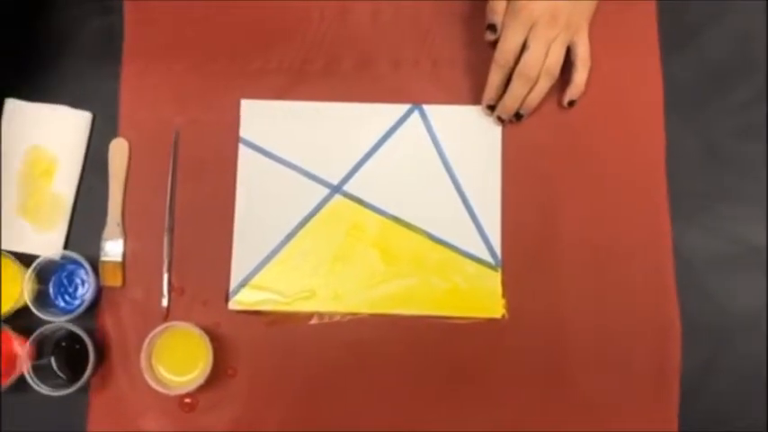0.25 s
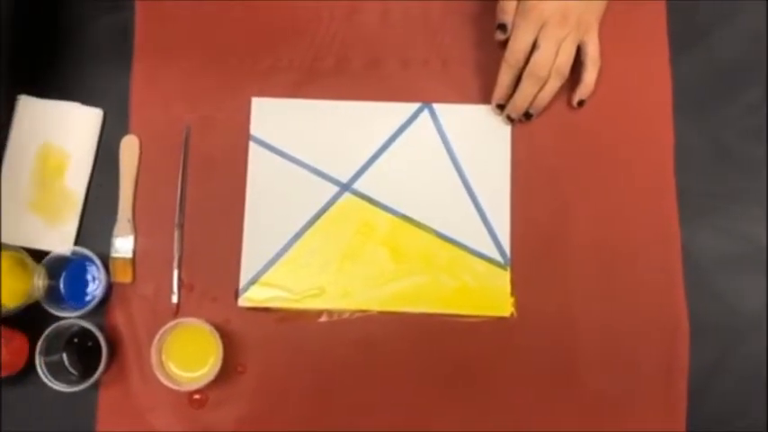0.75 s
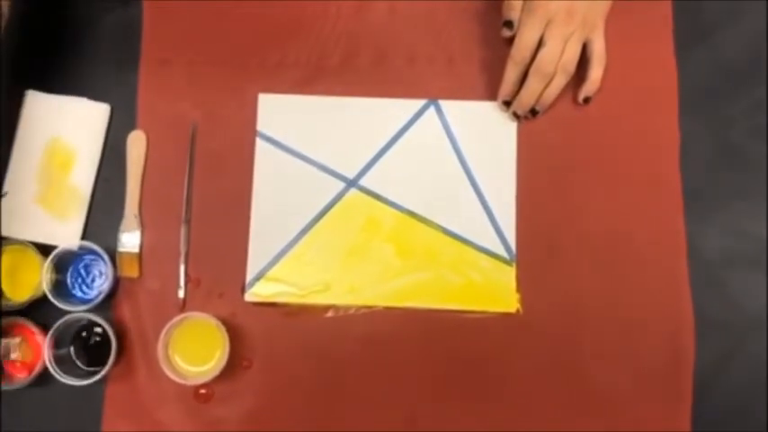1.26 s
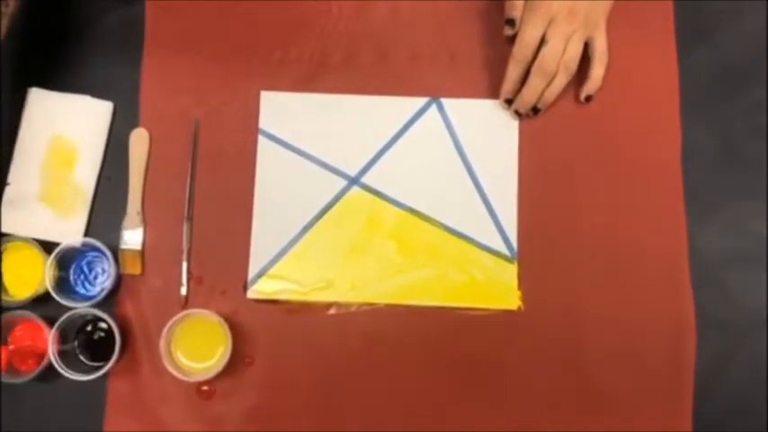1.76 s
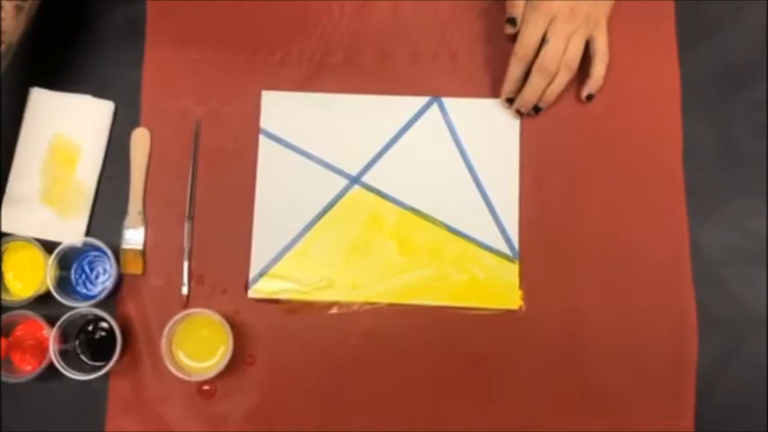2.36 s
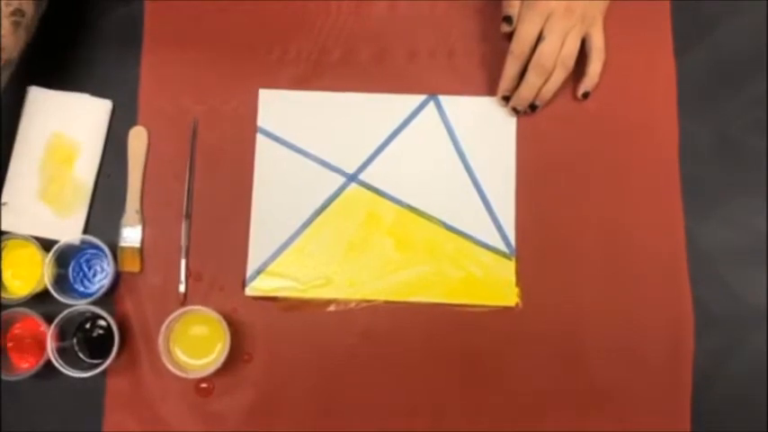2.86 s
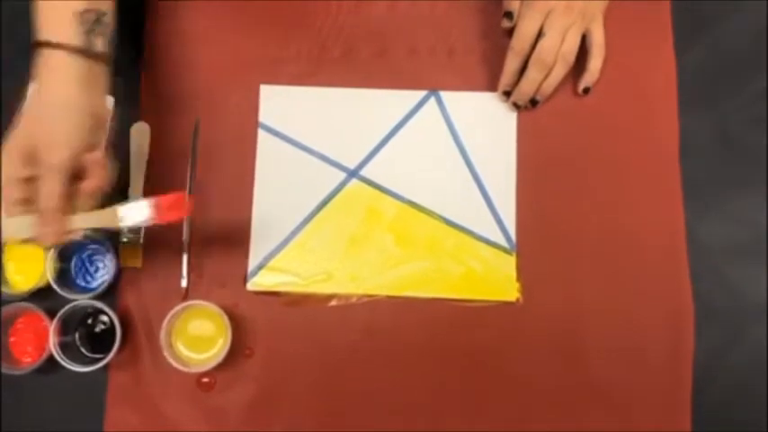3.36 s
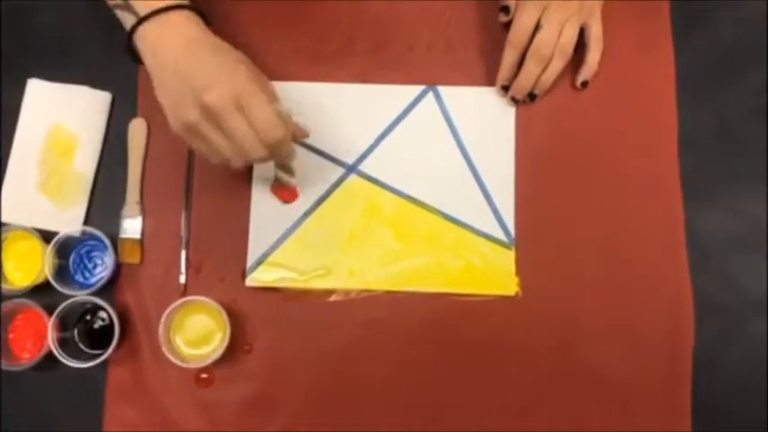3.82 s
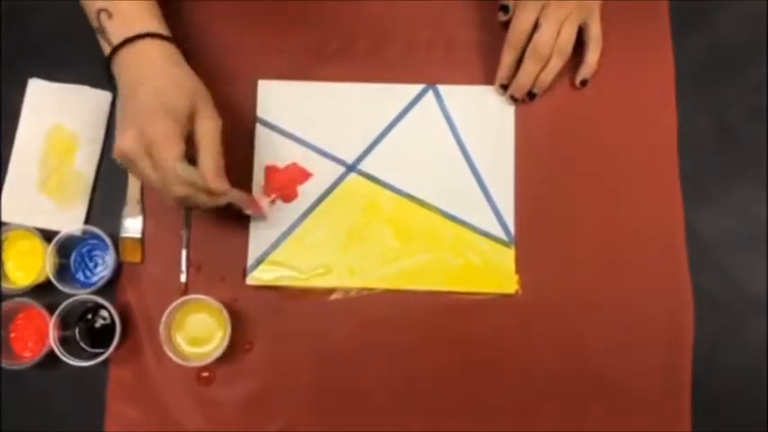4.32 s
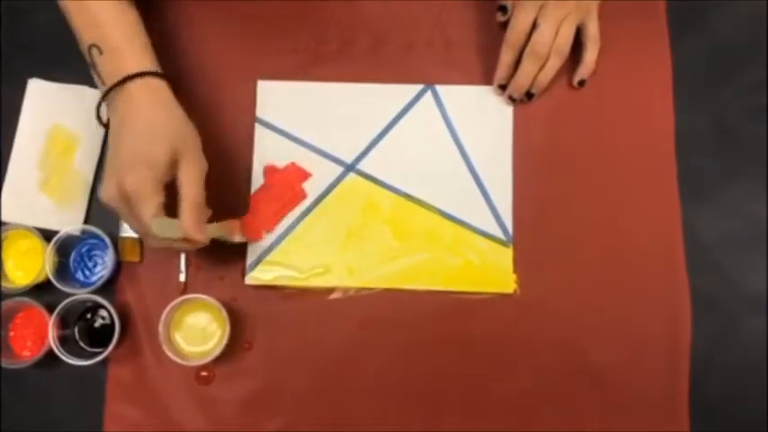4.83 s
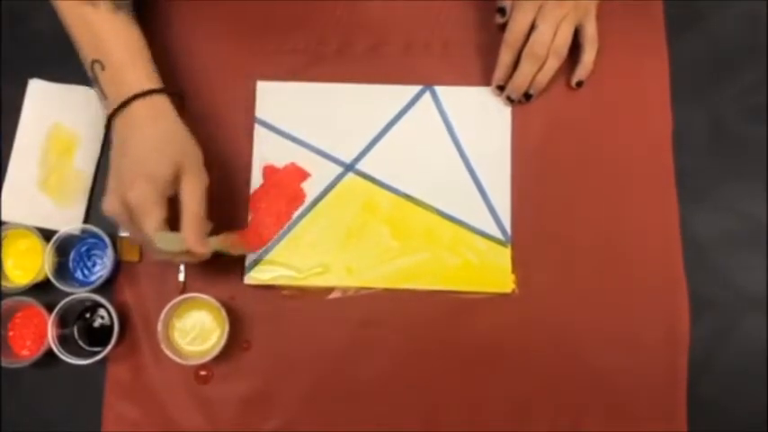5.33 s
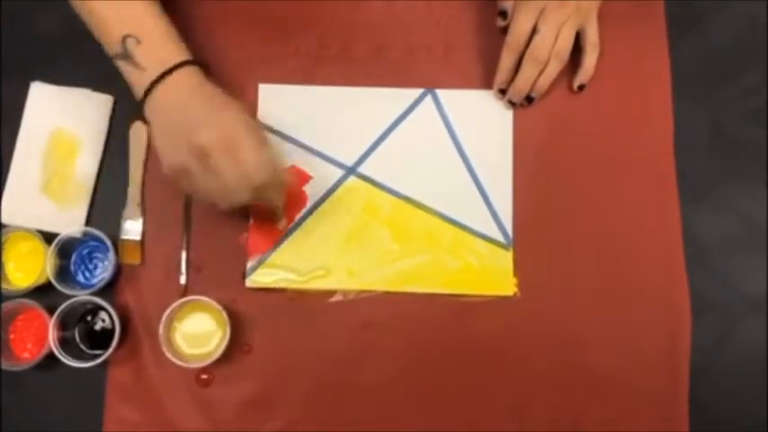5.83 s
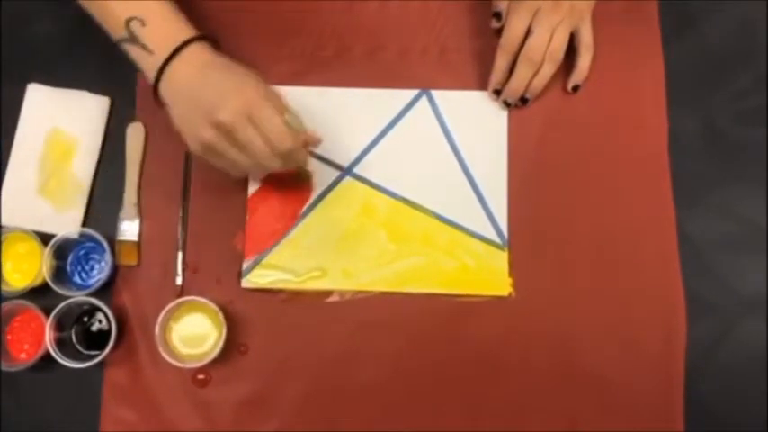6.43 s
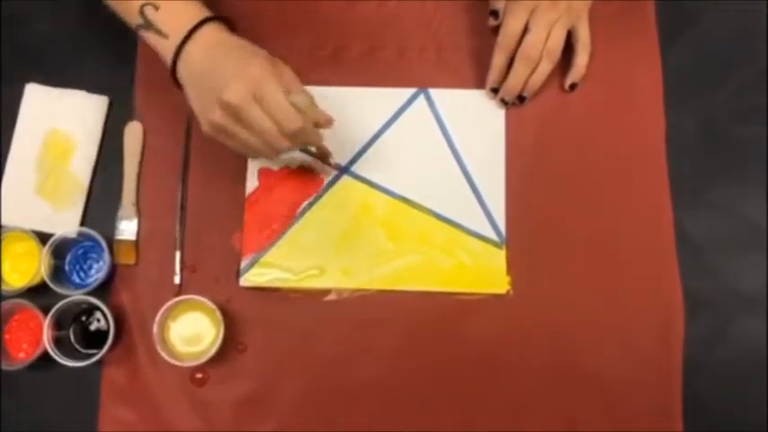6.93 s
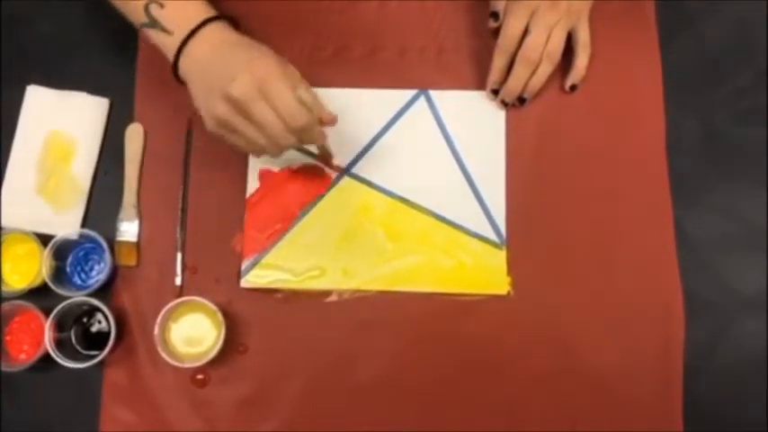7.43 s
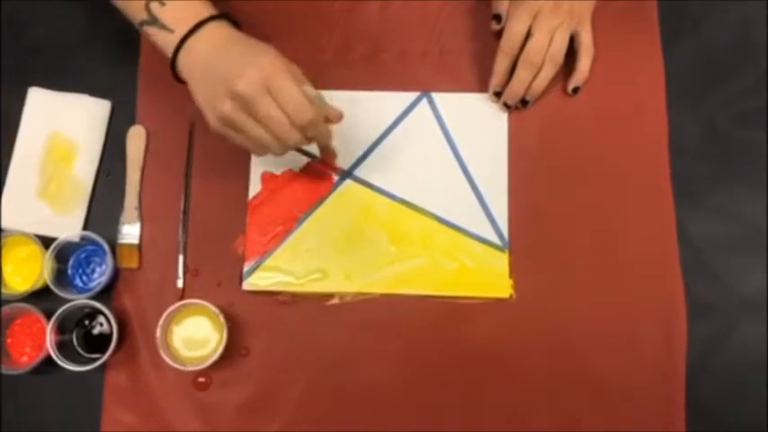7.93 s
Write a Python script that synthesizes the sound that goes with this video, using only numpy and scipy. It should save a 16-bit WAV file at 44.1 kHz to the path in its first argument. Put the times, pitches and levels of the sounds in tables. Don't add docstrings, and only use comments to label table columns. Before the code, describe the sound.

First comes the clutter of cups: a knock, a scrape, one loud double landing with tiny bounces, then scattered rattles and a squealing drag. After a near-quiet pause over hum and soft hiss, a sleeve rustles and bristles start dabbing and brushing a canvas, very softly and irregularly. Close microphone above the table, short dull room echo.

```python
import sys
import numpy as np
from scipy import signal
from scipy.fft import rfft, irfft
from scipy.io import wavfile
from scipy.ndimage import uniform_filter1d

SR = 44100
rng = np.random.default_rng(int(sys.argv[2]) if len(sys.argv) > 2 else 0)


def voltage_ratio(decibels):
    exponent = np.asarray(decibels, float) / 20
    return 10 ** exponent


def wav_out(sig):
    wavfile.write(sys.argv[1], SR, np.round(np.clip(np.atleast_2d(sig).T, -1, 1) * 32767).astype(np.int16))


N = 360738


def evened(x):
    return x / np.sqrt(np.mean(x ** 2) + 1e-20)


def read(points, hz):
    f, value = np.transpose(points)
    return np.interp(np.log(hz + 1), np.log(f + 1), value)


def curve(points):
    return np.interp(np.arange(N) / SR, *np.transpose(points))


def add(mix, s, sound):
    part = mix[round(s * SR):][:len(sound)]
    part += sound[:len(part)]


def resonate(x, hz, width):
    turn = np.exp(2j * np.pi * hz * np.arange(len(x)) / SR)
    r = np.exp(-np.pi * width / SR)
    return 2 * (turn * signal.lfilter([1 - r], [1, -r], x / turn)).real


def steep(x, hz, width):
    return evened(resonate(resonate(x, hz, width), hz, width))


def swells(s, db, swell_s, fade_s, bend=1):
    t = np.arange(0, N / SR + 0.002, 0.001)
    out = 0
    for at, top_db, up, down in np.broadcast(s, db, swell_s, fade_s):
        rise_db = 20 * np.maximum((at - t) / up, 0)
        fall_db = 20 * np.maximum((t - at) / down, 0) ** bend
        out = out + voltage_ratio(top_db - rise_db - fall_db)
    return np.interp(np.arange(N) / SR, t, out)


def scratch(per_s, spread_db, smooth):
    sizes = voltage_ratio(spread_db * np.minimum(rng.exponential(1, N), 5))
    slips = sizes * (rng.random(N) < per_s / SR)
    return evened(evened(slips * rng.standard_normal(N)) + smooth * rng.standard_normal(N))


def contact(t, t60):
    u = 9.3 * t / max(t60, 0.003)
    return u * np.exp(1 - u)


# frequency in Hz, density in dB per Hz.
AIR_SPECTRUM = [(20, -51), (42, -19), (58, -4.5), (80, 0.5), (150, -5), (200, -8), (340, -13.5),
                (480, -22.5), (850, -28.5), (1600, -40.5), (3200, -42), (7000, -45.5), (13700, -51),
                (14800, -54)]
# centre in Hz, width in Hz, level in dB.
AIR_BANDS = [(114, 9.2, -7), (2480, 770, 8.5), (3870, 160, 5.5), (8700, 170, 1.5), (9500, 170, 3.5),
             (15000, 690, 17)]


def air():
    level_db, patchy_db = -52, 0.6
    frames, hz = N // 512 + 6, np.fft.rfftfreq(2048, 1 / SR)
    a, b, patches = rng.standard_normal((frames, 1025, 3)).T
    patches = uniform_filter1d(patches, size=20, axis=0)
    patches = evened(uniform_filter1d(patches, size=8, axis=1))
    bands_db = sum(db / (1 + (2 * (hz - f) / w) ** 2) for f, w, db in AIR_BANDS)
    colour_db = read(AIR_SPECTRUM, hz) + bands_db
    z = (a + 1j * b) * voltage_ratio(colour_db[:, None] + patchy_db * patches)
    return voltage_ratio(level_db) * evened(signal.istft(z, nperseg=2048, noverlap=1536)[1][:N])


# frequency in Hz, width in Hz, level in dB.
FAN_TONES = [(270.9, 9.8, -65), (318.6, 4.6, -68), (349.4, 14, -66)]


def hum():
    hum_db, hum_hz = -46.5, 120.4
    flutter = steep(rng.standard_normal(N), hum_hz, 16)
    fan = sum(voltage_ratio(db) * steep(rng.standard_normal(N), hz, w) for hz, w, db in FAN_TONES)
    tone = np.sqrt(2) * np.sin(2 * np.pi * hum_hz * np.arange(N) / SR)
    return voltage_ratio(hum_db) * (tone + 0.12 * flutter) + fan


# time
# in seconds, level in dB.
WHIRR_LEVEL = [(0.0, -47), (0.2, -72), (0.8, -64), (1.41, -65), (1.62, -82), (3.16, -80), (3.62, -74),
               (4.03, -76), (4.65, -70), (5.88, -90), (6.79, -71.5), (7.4, -86), (7.81, -72.5), (8.18, -82)]
# time in seconds, change of the rumble in dB.
GUSTS = [(0.0, 13), (.7, -14), (1.16, 2), (1.6, -13), (2.78, 12.5), (3.16, -9), (3.62, 10), (4.3, 0),
         (5.88, 7), (6.79, -10), (8.18, -6)]


def ventilation():
    rumble_db, fizz_db, fizz_share = -63, -83, 0.18
    noise = rng.standard_normal((4, N))
    flicker = voltage_ratio(6.9 * evened(resonate(noise[0], 30.6, 30)))
    fizz = evened(flicker * steep(noise[1], 15100, 900))
    whirr = steep(noise[2], 1303, 170)
    rumble = steep(noise[3], 59.6, 11)
    gust_db = curve(GUSTS)
    moving_air = voltage_ratio(fizz_db + fizz_share * gust_db) * fizz + voltage_ratio(rumble_db + gust_db) * rumble
    return voltage_ratio(curve(WHIRR_LEVEL) - 3) * whirr + moving_air


# peak in seconds, level in dB, swell in seconds, fade in seconds.
RUSTLES = [
    (2.422, -67, 0.06, 0.11),
    (2.69, -66, 0.18, 0.11),
    (2.926, -69.5, 0.16, 0.12),
    (3.38, -70, .05, 0.054),
    (3.55, -64, 0.078, 0.21),
    (3.74, -74.5, .15, .06),
    (4.392, -65.5, 0.02, 0.027),
    (4.712, -71, 0.1, 0.036),
    (5.46, -70.5, .16, 0.08),
]
# frequency in Hz, level in dB.
RUSTLE_TONE = [(1500, -3.5), (3000, 2.5), (4000, -1), (5200, -6), (6200, 0.5), (7500, -8), (10000, -11),
               (14000, -30)]
# start in seconds, length in seconds, frequency in Hz, level in dB.
SQUEAKS = [
    (1.652, .05, 9500, -78),
    (7.59, 0.028, 9550, -79),
    (7.966, 0.038, 9800, -100.5),
    (8.07, 0.019, 9500, -82),
]


def rustle():
    crackle = scratch(2100, 2.6, 0.84)
    colour = voltage_ratio(read(RUSTLE_TONE, np.fft.rfftfreq(N, 1 / SR)))
    out = swells(*np.transpose(RUSTLES)) * evened(irfft(rfft(crackle) * colour, N))
    for s, length_s, hz, db in SQUEAKS:
        n = round(length_s * SR)
        squeak = steep(rng.standard_normal(4000), hz, 350)[:n]
        add(out, s, voltage_ratio(db) * squeak * np.hanning(n))
    return out


# peak in seconds, level in dB, swell in seconds,
# fade in seconds, low part in dB against it.
SLIDES = [
    (0.0, -46, 0.011, 0.11, 0.5),
    (.168, -52.5, 0.15, 0.061, 3),
    (.434, -46, 0.088, 0.17, 8),
    (.598, -56, .15, .1, -11),
    (.69, -55, 0.014, 0.12, -13),
    (.79, -60.5, 0.036, .2, 9),
    (.96, -67.5, 0.088, 0.49, 15),
    (1.17, -55.5, 0.25, 0.027, 2),
    (1.43, -56, .02, 0.13, -16),
    (1.53, -63, .15, 0.16, 9),
]
LONG_DRAG = [
    (1.275, -45.5, .1, 0.096, 0),
    (1.4, -53.5, 0.11, 0.016, 0),
]
# peak in seconds, level in dB, swell in seconds, fade in seconds.
RIM_SQUEALS = [
    (.04, -63, 0.089, 0.39),
    (.69, -64, .012, .1),
    (1.001, -70, .3, .35),
    (1.25, -54.5, 0.05, .25),
    (1.37, -67, .12, 0.062),
]


def slide():
    rub = scratch(1500, 2.5, 1.2)
    body = evened(steep(rub, 2146, 570) + 1.1 * steep(rub, 1900, 360))
    middle = steep(rub, 1160, 840)
    deep = evened(middle + 2.05 * steep(rub, 560, 800))
    out = swells(*np.transpose(RIM_SQUEALS)) * steep(rub, 4000, 560)
    for rows, low in (SLIDES, deep), (LONG_DRAG, middle):
        s, db, up, down, low_db = np.transpose(rows)
        out = out + swells(s, db, up, down) * body + swells(s, db + low_db, up, down) * low
    return out


# start in seconds, peak in dB, ring in Hz,
# thump in dB, tick in dB.
SET_DOWN = [
    (.3512, -46, 2000, -6, -3),
    (.357, -46, 2100, -14, -8),
    (.3653, -32, 3800, -25, -3),
    (.3683, -11, 1800, -20, -28),
    (.3702, -21, 1900, -17, -28),
    (.3753, -11.5, 1700, -2.5, -11),
    (.4152, -33, 2200, -18, -6),
    (.422, -30, 1350, -12, -12),
]
KNOCKS = [
    (0.027, -29.5, 1430, -2, -8.5),
    (0.097, -38, 2500, -26, -2),
    (0.769, -26.5, 1900, 4.5, -10),
    (0.948, -36.5, 2050, -18, -13),
    (0.986, -33, 2480, -6, -14),
    (1.411, -39, 2060, -24, -3),
    (4.827, -36, 2570, -10, -20),
]
# start in seconds, peak in dB, ring in Hz, thump in dB.
RATTLES = [(0.171, -45, 1400, -1), (0.22, -54.5, 2440, -3), (0.304, -55, 1290, -8), (0.562, -46, 2060, -1),
           (0.578, -39, 2230, -15), (0.604, -47, 2070, -8), (0.617, -44, 2480, -20),
           (0.681, -33, 2460, -28), (0.735, -38, 1860, 0), (0.746, -41, 2460, -4), (0.919, -54, 1990, -6),
           (1.038, -39, 2470, -16), (1.074, -41, 1840, -3), (1.104, -39.5, 2260, 1),
           (1.123, -37, 1340, -20), (1.137, -30.5, 1400, -3.5), (1.333, -38, 1920, -2),
           (1.444, -34, 2300, -23), (1.488, -39, 2480, 5), (1.543, -43, 1220, -26),
           (1.553, -48, 1300, -6.5), (5.128, -51.5, 2500, 3.5)]
# frequency in Hz, width in Hz, level in dB.
TABLE_SHIVER = [(199.6, 99.3, -11), (488, 200, 8), (900, 1400, 23), (1335, 630, -3), (1900, 514, -2.5),
                (2500, 440, -49), (4000, 800, -52.5)]
# frequency in Hz, level in dB, t60 in seconds.
TABLE_MODES = [(150, -17, .05), (186, -14, .06), (312, -16, .05), (449, -11, .06), (560, -22, .04)]


def knocks():
    soft_t60, hard_t60 = 0.014, 0.0048
    hard_db, hard_span_db = -26, 3
    rattle_tick_db = -24
    out, t = np.zeros(N), np.arange(5000) / SR
    fall_hz = 450 + 900 * np.exp(-t / 0.0033)
    thump = np.sin(2 * np.pi * np.cumsum(fall_hz) / SR) * voltage_ratio(-60 * t / 0.022)
    modes = sum(voltage_ratio(d - 60 * t / ring_s) * np.sin(2 * np.pi * f * t) for f, d, ring_s in TABLE_MODES)
    thump = thump + (1 - np.exp(-(t / 0.0013) ** 2)) * modes
    for s, db, hz, thump_db, tick_db in SET_DOWN + KNOCKS + [(*row, rattle_tick_db) for row in RATTLES]:
        t60 = hard_t60 + (soft_t60 - hard_t60) / (1 + np.exp((db - hard_db) / hard_span_db))
        grit = rng.standard_normal((3, len(t)))
        crack = 0.9 * t60 / soft_t60 * steep(grit[0], (hz + 1800) / 2, 1500)
        ring = (np.sin(2 * np.pi * hz * t) + crack) * contact(t, t60)
        tick = voltage_ratio(tick_db) * resonate(grit[1], 5800, 4500) * contact(t, 0.5 * t60)
        shiver = evened(sum(voltage_ratio(d) * steep(grit[2], f, w) for f, w, d in TABLE_SHIVER))
        shiver = shiver * voltage_ratio(-60 * t / 0.15) * (1 - np.exp(-t / 0.00057))
        heavy = voltage_ratio(thump_db) * (thump + voltage_ratio(-13.5) * shiver)
        add(out, s, voltage_ratio(db) * (ring + tick + heavy))
    return out


# start in seconds, peak in dB, centre in Hz, t60 in seconds.
DABS = [
    (3.9288, -57, 2580, 0.025),
    (4.2632, -44.5, 2240, 0.032),
    (4.5452, -48, 2500, 0.015),
    (4.799, -48, 2500, 0.044),
    (5.0836, -39.5, 2000, 0.043),
    (5.35, -43, 2310, 0.039),
    (5.6302, -52.5, 2300, 0.039),
    (7.112, -42, 2380, 0.065),
    (7.593, -51, 2560, 0.035),
    (8.1248, -46, 2350, 0.056),
]


def dabs():
    out, t = np.zeros(N), np.arange(3000) / SR
    for s, db, hz, t60 in DABS:
        puff = steep(rng.standard_normal(len(t)), hz, 950) * contact(t, t60)
        add(out, s - 0.002, voltage_ratio(db - 3.5) * puff)
    return out


# frequency in Hz, width in Hz, level in dB.
CANVAS_WEAVE = [(2400, 196, 12), (2300, 1400, 0), (3080, 1200, -9)]
# peak in seconds, drag in dB, fade in seconds,
# canvas drum in dB against the drag.
PRESSES = [(2.907, -60, 0.092, 2), (3.665, -71, 0.18, -8), (3.925, -56.5, 0.097, -10),
           (4.264, -54, 0.19, -11), (4.542, -60.5, 0.037, 3.5), (4.8, -44, 0.02, -14),
           (4.843, -67, 0.06, 8), (5.08, -67, .07, -5), (5.347, -60, 0.035, -2), (5.634, -64, 0.014, 7),
           (5.655, -70.5, 0.67, -4), (5.894, -79, 0.2, 4), (6.181, -64, 0.19, -8),
           (6.254, -59.5, 0.088, 2.5), (4.576, -66.5, 0.027, 7.5), (6.68, -56, 0.078, -19),
           (6.9, -78, 0.082, 6), (7.11, -59, 0.12, -2), (7.341, -65, .09, -18), (7.596, -53, 0.14, -18),
           (7.836, -68.5, 0.47, -9), (8.12, -70, .3, -15)]
# peak in seconds, drag in dB, swell in seconds,
# canvas drum in dB against the drag.
LIFTS = [(2.242, -67, .08, -5), (2.69, -60, 0.063, 4), (3.784, -59.5, 0.17, -20), (4.05, -61, 0.03, -15),
         (4.69, -75, 0.12, 4), (4.99, -69.5, 0.39, -7), (5.2, -71, 0.041, -6), (5.487, -69, 0.33, -7),
         (5.74, -71, 0.041, -5), (6.072, -59.5, 0.06, -15), (6.591, -60.5, 0.079, -9),
         (6.769, -63.5, .03, -10), (7.008, -65.5, 0.12, -12), (7.22, -56, .04, -19), (7.485, -62, .11, -19),
         (7.715, -59, 0.083, -11), (7.974, -68, 0.11, -14), (8.17, -55, 0.028, -25)]


def brush():
    press_s, lift_s = 0.0046, 0.016
    run_out = 1.1
    press_low_db, lift_low_db = -0.5, -3
    low_fade = 0.41
    weight_low_db = -1
    rub = scratch(1500, 2.5, 1.2)
    weave = evened(sum(voltage_ratio(db) * steep(rub, hz, w) for hz, w, db in CANVAS_WEAVE))
    drum, lower = steep(rub, 1380, 740), steep(rub, 1990, 620)
    s, db, fade, drum_db = np.transpose(PRESSES)
    at, top_db, swell, beat_db = np.transpose(LIFTS)
    press = swells(s, db, press_s, fade, run_out)
    lift = swells(at, top_db, swell, lift_s)
    beat = swells(s, db + drum_db, press_s, fade, run_out) + swells(at, top_db + beat_db, swell, lift_s)
    low = swells(s, db + press_low_db, press_s, low_fade * fade)
    low = low + voltage_ratio(lift_low_db) * lift + voltage_ratio(weight_low_db) * beat
    return (press + lift) * weave + low * lower + beat * drum


# frequency in Hz, level in dB.
ROOM_TONE = [(2600, -5), (3300, -8), (6000, -21), (12000, -16.5)]
# frequency in Hz, t60 in seconds.
ROOM_T60 = [(200, 1), (1000, 0.2), (3000, 0.13), (8000, 0.36)]


def room(x):
    taps = np.zeros(SR // 2)
    at = np.arange(120, SR // 2 - 20, 20)
    taps[at + rng.integers(0, 20, len(at))] = rng.choice([-1., 1.], len(at))
    hz, t, z = signal.stft(taps, SR, nperseg=256)
    decay_db = read(ROOM_TONE, hz)[:, None] - 60 * t / read(ROOM_T60, hz)[:, None]
    tail = signal.istft(z * voltage_ratio(decay_db), SR, nperseg=256)[1]
    return signal.fftconvolve(x, tail / np.linalg.norm(tail))[:N]


# frequency in Hz, level in dB.
MIC_PATH = [(2000, -3), (2650, -2), (3000, -9), (3400, -10), (4000, -5.5), (5200, -9), (7000, -19.5),
            (8700, -12.5), (15000, -29)]


def to_microphone(x):
    log_gain = np.log(voltage_ratio(read(MIC_PATH, abs(np.fft.fftfreq(2048, 1 / SR)))))
    taps = np.fft.ifft(np.exp(log_gain - 1j * signal.hilbert(log_gain).imag)).real[:1024]
    return signal.oaconvolve(x, taps)[:N]


def scene():
    background = air() + hum() + ventilation() + rustle()
    rubs = slide() + dabs() + brush()
    blows = knocks()
    near = blows + rubs + room(voltage_ratio(-13) * blows + voltage_ratio(-17) * rubs)
    return (to_microphone(near) + background)[None]


def roll_off(x):
    return signal.sosfilt(signal.butter(12, 16350, fs=SR, output="sos"), x)


def record(dry):
    cut = signal.sosfilt(signal.butter(3, 44, "high", fs=SR, output="sos"), dry)
    band_limit = signal.firwin(511, 15750, window=("kaiser", 9), fs=SR)
    limited = signal.oaconvolve(cut, band_limit[None], "same")
    return roll_off(limited)


dry = scene()
out = record(dry)
wav_out(out)
```